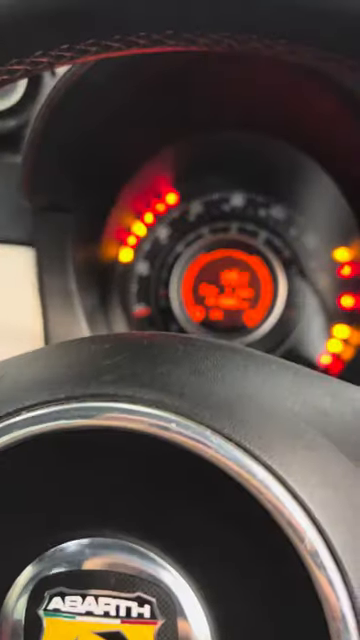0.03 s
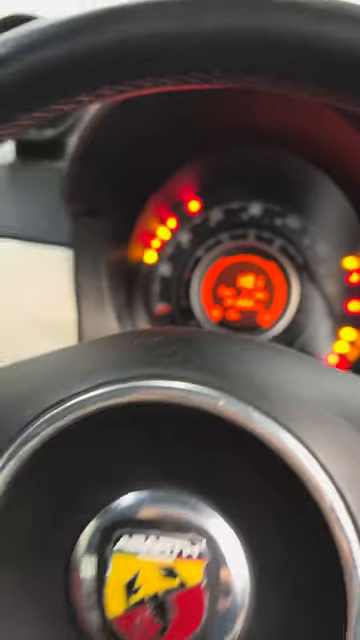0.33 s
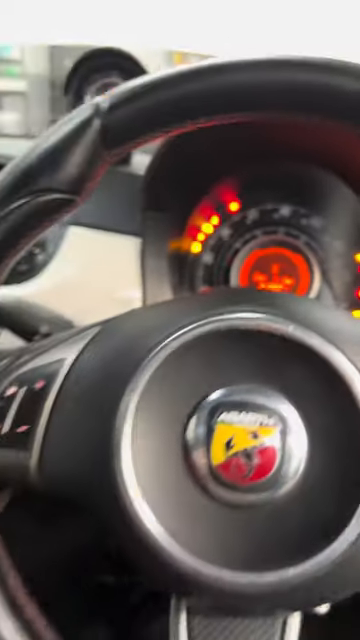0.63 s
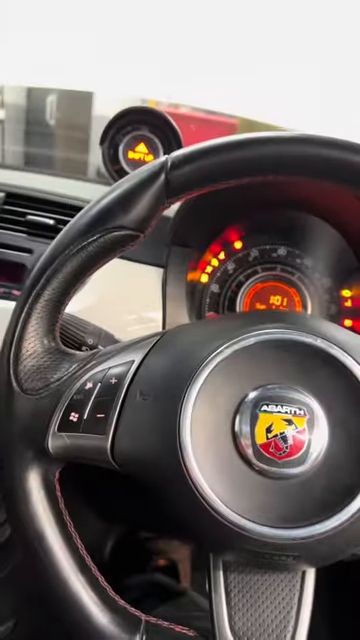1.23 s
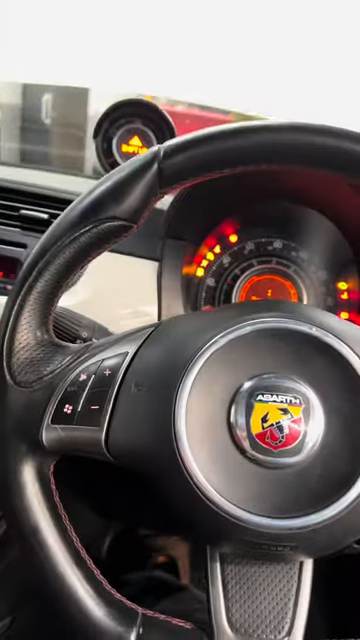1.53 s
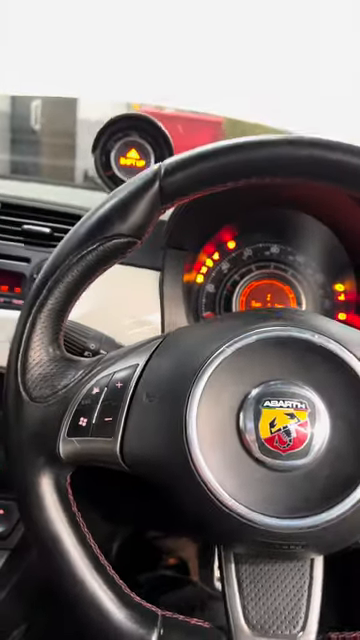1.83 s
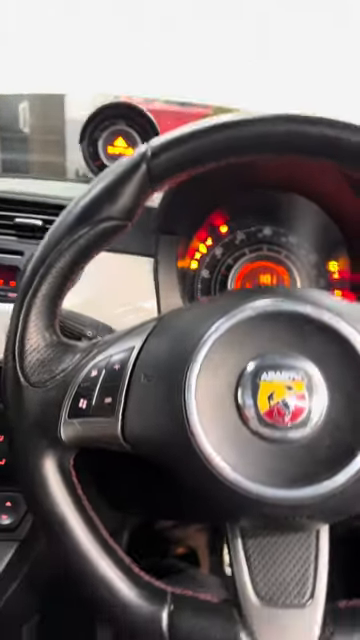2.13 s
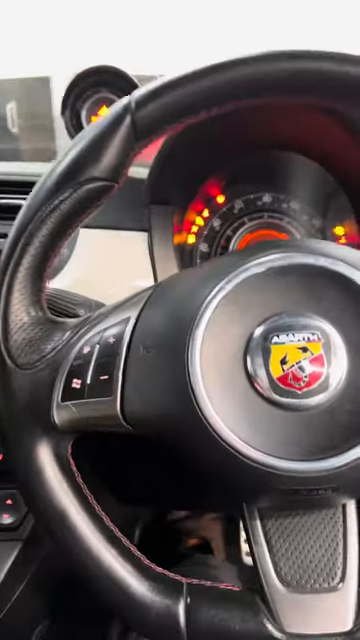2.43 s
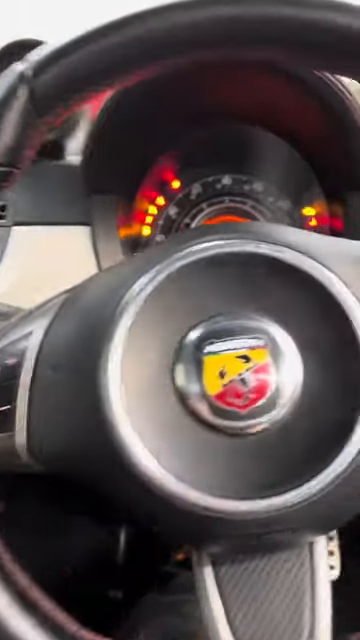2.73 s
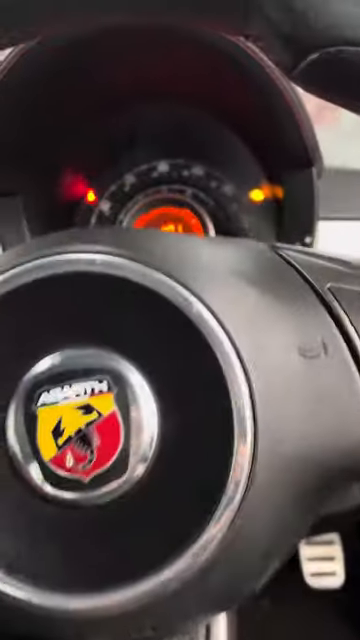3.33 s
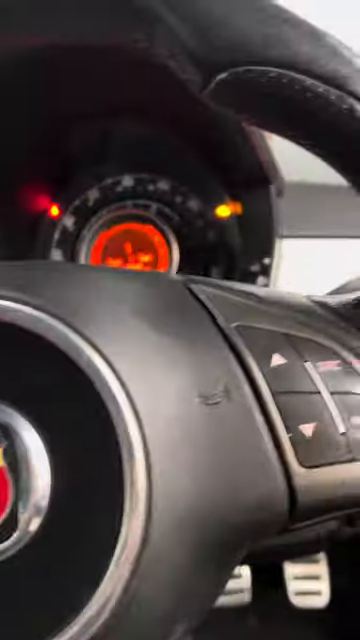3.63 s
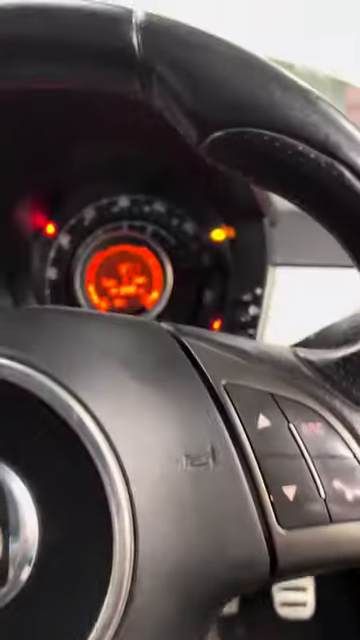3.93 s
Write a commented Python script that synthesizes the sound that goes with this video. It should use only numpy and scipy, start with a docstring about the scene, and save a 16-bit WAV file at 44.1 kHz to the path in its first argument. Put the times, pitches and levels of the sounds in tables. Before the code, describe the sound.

Inside a closed, parked car, the engine idles steadily, its hum gently swelling and fading as the phone moves. Brief rumble and rustle open it, and scattered plastic clicks and soft knocks follow.

```python
"""Idling car, driver's seat

A four-cylinder engine idles, heard in the closed cabin on a hand-held phone. The phone moves through
standing waves, so each firing harmonic swells and fades alone. Shaken body panels drone and sing
under faint air hiss and a hollow wash. Handling adds rumble, plastic clicks, knocks and rustle.
A faint, thin whistle sounds once, briefly."""
import sys
import numpy as np
from scipy import signal
from scipy.fft import rfft, irfft
from scipy.io import wavfile
from scipy.ndimage import uniform_filter1d

SR = 44100
rng = np.random.default_rng(int(sys.argv[2]) if len(sys.argv) > 2 else 0)


def output_pcm(signal):
    """Save a mono or channel-first signal as 16-bit PCM at the path in sys.argv[1].

    Samples are clipped to [-1, 1] before scaling.
    """
    pcm = np.clip(np.atleast_2d(signal).T, -1, 1) * 32767
    wavfile.write(sys.argv[1], SR, np.round(pcm).astype(np.int16))


N = 176400

# idle firing rate: t/s, f/Hz
FIRING_HZ = [(0, 44), (0.2, 44.4), (0.45, 43.75), (0.8, 43.85), (1.1, 44.25), (1.45, 45), (1.72, 44.25),
             (1.93, 45.85), (2.15, 45.6), (2.45, 45.7), (2.7, 45), (3, 44.35), (3.25, 44.3), (3.45, 43.05),
             (3.9, 43.95), (4, 43.9)]
# firing harmonics 1-5 and loudest panel, at the phone: t/s, level/dB
HARMONIC_1_DB = [(0.0, -23.5), (0.22, -31), (1.04, -47), (1.76, -30), (2.22, -40), (3.32, -36.5),
                 (3.54, -50.5), (4.0, -39.5)]
HARMONIC_2_DB = [(0.0, -28.5), (0.08, -10.5), (0.14, -39), (0.2, -22.5), (0.299, -17.5), (0.54, -15),
                 (0.998, -15.5), (1.46, -24.5), (1.78, -18), (1.959, -30), (2.26, -22), (3.0, -30),
                 (3.321, -25.5), (3.419, -18), (3.68, -24.5), (4.0, -19)]
HARMONIC_3_DB = [(0.0, -27.5), (0.94, -35.5), (1.22, -42), (1.5, -31.5), (1.96, -31), (2.12, -40.5),
                 (2.64, -37), (3.26, -49), (3.38, -27), (3.62, -26.5), (4.0, -53.5)]
HARMONIC_4_DB = [(0.0, -41), (0.4, -46), (0.979, -33), (1.72, -34.5), (2.66, -32), (3.28, -34), (3.66, -51),
                 (3.84, -38.5), (4.0, -25)]
HARMONIC_5_DB = [(0.0, -65), (0.422, -42), (0.94, -45.5), (1.119, -43), (1.781, -39.5), (2.218, -25),
                 (2.52, -24.5), (2.98, -42.5), (4.0, -33.5)]
LOUDEST_PANEL_DB = [(0, -44), (.34, -29), (.5, -49), (.94, -53), (1.34, -31), (1.76, -38.5), (1.949, -25),
                    (2.7, -29.5), (3.46, -47), (4, -32.5)]

# relative spectra of the continuous layers: f/Hz, level/dB
DRONE_TONE_SPECTRUM = [(150, -14), (200, -2.5), (245, -6), (290, -6.5), (335, -1), (361, 7), (378, -6.5),
                       (400, -4.5), (425, 1), (445, -5.5), (495, -4.5), (525, -22.5), (549, 0),
                       (580, -19.5), (610, -11.5), (720, -17.5)]
DRONE_NOISE_SPECTRUM = [(30, -40.5), (70, -15), (120, -4.5), (200, -3), (260, -6.5), (310, -2.5), (350, -2),
                        (400, 3), (450, -4.5), (495, 4.5), (520, -7), (550, 3), (580, -3.5), (610, -21.5),
                        (665, -11.5), (750, -22), (1500, -51.5)]
AIR_SPECTRUM = [(100, 7.5), (400, -0.5), (620, -12.5), (820, -0.5), (950, -4), (1100, 1), (1250, -3.5),
                (1480, 0.5), (1620, -1.5), (1750, -4.5), (1900, -5.5), (2700, -9.5), (3300, -13),
                (4300, -13), (5000, -18), (5700, -50.5), (8000, -21), (10000, -29), (12000, -58)]
HISS_SPECTRUM = [(2000, -17), (3800, 2.5), (4600, -4.5), (5200, 5), (5700, 8.5), (7200, 8), (8200, 3),
                 (9300, -6), (10500, -24), (12000, -57), (15000, -56)]
WASH_SPECTRUM = [(400, -31), (560, -8.5), (680, 17.5), (790, -4.5), (900, -6), (1100, -17.5), (1500, -45)]
RUMBLE_SPECTRUM = [(8, -38.5), (18, 3), (30, -15.5), (60, 5), (100, 5.5), (160, 0), (300, -40), (800, -62)]
# their envelopes: t/s, level/dB
DRONE_DB = [(0, -27), (.14, -23.5), (.3, -29), (.5, -30), (1.1, -34.5), (1.8, -33.5), (2.3, -34),
            (2.8, -32), (3.3, -35), (4, -31.5)]
AIR_DB = [(0, -32.5), (.12, -33), (.3, -40.5), (.5, -42), (.8, -43.5), (1.55, -42.5), (2.2, -42.5),
          (3.2, -44), (3.8, -43.5), (3.9, -41.5), (4, -43)]
HISS_DB = [(0, -42), (.1, -41), (.32, -51.5), (.5, -53), (.8, -54.5), (1.6, -55.5), (3.2, -55), (3.85, -55),
           (4, -51.5)]
WASH_DB = [(0, -47), (.12, -41.5), (.4, -46.5), (.7, -59.5), (1.9, -69.5), (2.5, -48.5), (3.1, -50.5),
           (3.7, -48.5), (3.83, -52), (3.9, -41), (4, -44)]
RUMBLE_DB = [(0, -43), (.1, -19.5), (.22, -23.5), (.4, -38.5), (1.1, -36), (1.7, -39.5), (2.3, -49.5),
             (2.5, -35), (2.6, -28), (2.75, -35.5), (3.8, -33.5), (3.95, -25), (4, -32.5)]

# plastic clicks: t/s, body/dB, clack/dB, snap/dB, attack/s, t60/s
CLICK_HITS = [(0.0446, -43, -30, -23.5, 0.00078, 0.04), (0.0646, -33, -28.5, -16.5, 0.0012, 0.023),
              (.452, -46, -44.5, -45, .002, 0.07), (0.903, -49.5, -42.5, -52, 0.0056, 0.13),
              (.934, -45, -46.5, -57, 0.0033, 0.13), (0.9816, -25, -37, -38.5, 0.0011, 0.041),
              (1.039, -65, -67, -48, .003, 0.036), (1.216, -38, -43, -49, 0.00061, 0.027),
              (1.722, -65, -46, -51.5, 0.0049, 0.11), (2.373, -58, -42.5, -56, 0.0015, 0.07),
              (2.485, -32, -39.5, -42.5, 0.0015, .055), (2.54, -38, -39.5, -45.5, .002, 0.049),
              (2.5537, -28, -29, -37.5, 0.0017, 0.026), (2.5593, -25.5, -28.5, -47, 0.0011, 0.021),
              (3.312, -69, -64, -49, .002, 0.03), (3.684, -61, -55, -45.5, 0.0019, 0.028),
              (3.884, -37, -65, -60, 0.0014, 0.078), (3.9, -38, -59, -43, 0.0069, 0.044),
              (3.948, -40, -46, -38.5, 0.0015, 0.14)]
# low, mid and high click bands, relative: f/Hz, level/dB
BODY_SPECTRUM = [(300, -14.5), (520, 5), (700, -22), (900, 26.5), (1200, 18), (1450, 11), (2000, -47.5)]
CLACK_SPECTRUM = [(1000, -37), (1800, -1), (2300, 2), (2600, 3), (3200, -6), (4200, -9), (5200, -16.5),
                  (9000, -32), (13000, -64.5)]
SNAP_SPECTRUM = [(2500, -24.5), (3800, -2.5), (5000, -4), (5700, -1.5), (7000, -1), (8400, -4.5),
                 (10000, -14), (11600, -13), (12800, -37.5), (15500, -53)]
# plastic trim modes: f/Hz, level/dB re clack, t60/s
TRIM_MODES = [(910, -21, .15), (1100, -18, .14), (1410, -8.5, 0.053), (2314, -5.5, 0.054),
              (2525, -5.5, .03), (2820, -17, 0.046), (4300, -21.5, .04)]
# soft knocks: t/s, f/Hz, level/dB, t60/s
KNOCK_HITS = [(0.05, 75.3, -8, 0.043), (0.129, 367, -9.5, 0.07), (.157, 329, -14.5, 0.062),
              (.172, 502, -21, 0.2), (.226, 448, -20, 0.093), (0.299, 530, -20, 0.079),
              (.983, 490, -18, 0.05), (2.488, 850, -27.5, 0.11), (2.555, 70.4, -24.5, 0.86),
              (3.868, 263, -19.5, 0.15), (3.898, 994, -19.5, 0.057), (3.922, 284.4, -19, 0.14),
              (3.952, 760, -23, 0.067), (3.96, 394, -28.5, 0.089)]
# grip shifts: t/s, sigma/s, level/dB
RUSTLE_SWELLS = [(0.074, 0.024, -39), (.19, 0.082, -46), (.27, 0.063, -45.5), (1.87, 0.13, -60.5)]
# grip rustle, relative: f/Hz, level/dB
RUSTLE_SPECTRUM = [(700, -22.5), (1100, 8), (1500, 3), (1850, 7.5), (2300, -11.5), (4000, -34)]
# panel resonances: f/firing rate, t/s, sigma/s, level/dB
PANEL_SWELLS = [(4.25, .18, .04, -24.5), (4.25, .278, .03, -23), (8.25, .255, .045, -26.5),
                (7.75, .33, .03, -31), (8.25, .72, .26, -33.5), (7.75, 2.42, .22, -31.5),
                (8.25, 2.25, .22, -35), (9.25, 2.3, .38, -34.5), (10.25, 2.3, .2, -41), (12, 1.45, .3, -42),
                (12, 2.32, .2, -37), (8.25, 3.74, .1, -36)]
# thin whistle, relative: f/Hz, level/dB
WHISTLE_SPECTRUM = [(6500, -42), (7300, -19), (7460, 1), (7650, -5), (8300, -38)]

# left microphone port re right: f/Hz, lead/rad
PORT_LEAD_RAD = [(90, 0), (180, .45), (270, 1), (400, 1.98), (560, 2.25), (700, 2.8), (900, 2.4),
                 (1500, 4.9), (3000, 4.6), (4200, 5.0), (5000, 5.3), (5600, 6.28), (7300, 6.28),
                 (9000, 5.4), (13000, 3.3)]
# left port re right: f/Hz, level/dB
PORT_BALANCE_DB = [(45, 0), (88, -2), (132, -3.5), (180, -6.5), (226, -2), (360, -0.7), (560, 0.5),
                   (1200, 3.5), (3500, 1.5), (6000, 0.4)]

TIME_S = np.arange(N) / SR


def undb(db):
    """Decibels to gain."""
    return 10 ** (np.asarray(db) / 20)


def unit(x):
    """Scale to rms 1."""
    return x / np.sqrt(np.mean(x ** 2))


def curve(rows):
    """Interpolate (t/s, value) rows per sample."""
    return np.interp(TIME_S, *np.array(rows, float).T)


def per_bin(rows):
    """Interpolate (f/Hz, value) rows per FFT bin, in log f."""
    hz, value = np.array(rows, float).T
    bin_hz = np.arange(N + 1) * SR / (2 * N)
    return np.interp(np.log(bin_hz + 1e-9), np.log(hz), value)


def shape(x, response):
    """Filter by a frequency response."""
    return irfft(rfft(x, 2 * N) * response)[..., :N]


def noise(spectrum):
    """Coloured noise, rms 1."""
    return unit(shape(rng.standard_normal(N), undb(per_bin(spectrum))))


def diffuse(spectrum):
    """Coloured noise, independent left and right."""
    return np.array([noise(spectrum), noise(spectrum)])


def walk(rate_hz, count=N, hold=8):
    """Smooth random drift, rms about 1; count points span the scene."""
    steps = np.repeat(rng.standard_normal(200), hold)
    smooth = unit(uniform_filter1d(uniform_filter1d(steps, hold), hold))
    return np.interp(np.linspace(0, N / SR * rate_hz * hold, count), np.arange(len(smooth)), smooth)


def strike(at_s, attack_s, t60_s):
    """Exponential rise to 1 at at_s + attack_s, then decay."""
    t = TIME_S - (at_s + attack_s)
    log_gain = np.minimum(t / attack_s, -np.log(1000) * t / t60_s)
    return np.exp(np.maximum(log_gain, -20))


def swell(at_s, sigma_s):
    """Gaussian envelope."""
    return np.exp(-((TIME_S - at_s) / sigma_s) ** 2 / 2)


def engine_boom(firings, waver_db=.4, panel_multiple=8.75):
    """Firing harmonics stand as waves in the cabin; one loud panel tone lies above them."""
    tones = [(1, HARMONIC_1_DB), (2, HARMONIC_2_DB), (3, HARMONIC_3_DB), (4, HARMONIC_4_DB),
             (5, HARMONIC_5_DB), (panel_multiple, LOUDEST_PANEL_DB)]
    out = 0
    for multiple, levels in tones:
        gain = np.sqrt(2) * undb(curve(levels) + waver_db * walk(20))
        out += gain * np.sin(2 * np.pi * (multiple * firings + rng.random()))
    return out


def panel_drone(firings, even_db=-5, waver_db=4.5, waver_rad=.44, noise_db=-1.5, decimation=15):
    """Unequal cylinders shake the body at mostly odd cycle harmonics; its resonances favour a few."""
    body_hz, body_db = np.array(DRONE_TONE_SPECTRUM, float).T
    cycle_hz = curve(FIRING_HZ)[::decimation] / 4  # four firings per cycle
    cycles = firings[::decimation] / 4
    tones = 0
    for harmonic in range(17, 67):
        level_db = np.interp(harmonic * cycle_hz, body_hz, body_db) + even_db * (harmonic % 2 == 0)
        gain = undb(level_db + waver_db * walk(2.72, len(cycles)))
        drift_rad = waver_rad * walk(10, len(cycles)) + 2 * np.pi * rng.random()
        tones += gain * np.sin(2 * np.pi * harmonic * cycles + drift_rad)
    drone = unit(signal.resample_poly(tones, decimation, 1, window="blackmanharris")[:N])
    roar = undb(noise_db) * noise(DRONE_NOISE_SPECTRUM)
    return (drone + roar) * undb(curve(DRONE_DB))


def cabin_air(flicker_db=1.44):
    """Diffuse air noise with a flickering level."""
    return diffuse(AIR_SPECTRUM) * undb(curve(AIR_DB) + flicker_db * walk(24.94))


def high_hiss(flicker_db=.85):
    """Faint treble hiss, common to both ports."""
    return noise(HISS_SPECTRUM) * undb(curve(HISS_DB) + flicker_db * walk(24.92))


def hollow_wash(diffuse_db=-1):
    """Noise band just above the drone, partly diffuse."""
    direct = ports(noise(WASH_SPECTRUM))
    return (direct + undb(diffuse_db) * diffuse(WASH_SPECTRUM)) * undb(curve(WASH_DB))


def phone_rumble():
    """Low noise of the moving phone."""
    return noise(RUMBLE_SPECTRUM) * undb(curve(RUMBLE_DB))


def plastic_clicks(tail_db=-15, tail_t60_s=.13):
    """Plastic rings in three broad bands with a short cabin tail, plus sharp trim modes."""
    body, clack, snap = noise(BODY_SPECTRUM), noise(CLACK_SPECTRUM), noise(SNAP_SPECTRUM)
    out = 0
    for at_s, body_db, clack_db, snap_db, attack_s, t60_s in CLICK_HITS:
        envelope = strike(at_s, attack_s, t60_s) + undb(tail_db) * strike(at_s, attack_s, tail_t60_s)
        bands = undb(body_db) * body + undb(clack_db) * clack + undb(snap_db) * snap
        ring = sum(undb(db) * strike(at_s, attack_s, ring_s) * np.sin(2 * np.pi * hz * TIME_S)
                   for hz, db, ring_s in TRIM_MODES)
        out += envelope * bands + undb(clack_db) * ring
    return out


def soft_knocks(attack_s=.0047):
    """Handling bumps, one damped resonance each."""
    return sum(undb(db) * strike(at_s, attack_s, t60_s) * np.sin(2 * np.pi * hz * (TIME_S - at_s))
               for at_s, hz, db, t60_s in KNOCK_HITS)


def grip_rustle():
    """The hand rubs the phone as the grip shifts."""
    envelope = sum(undb(db) * swell(at_s, sigma_s) for at_s, sigma_s, db in RUSTLE_SWELLS)
    return diffuse(RUSTLE_SPECTRUM) * envelope


def singing_panels(firings):
    """Single panels resonate on engine orders, swelling at set times."""
    return sum(np.sqrt(2) * undb(db) * swell(at_s, sigma_s) * np.sin(2 * np.pi * multiple * firings)
               for multiple, at_s, sigma_s, db in PANEL_SWELLS)


def faint_whistle(level_db=-51.5):
    """Faint, brief, thin whistle near 7.5 kHz."""
    return noise(WHISTLE_SPECTRUM) * undb(level_db) * swell(at_s=.322, sigma_s=.03)


def ports(x):
    """Sound reaches the two microphone ports with different phase."""
    lead_rad = per_bin(PORT_LEAD_RAD)
    return shape(x, np.exp(.5j * np.array([lead_rad, -lead_rad])))


def scene():
    """Engine, air, handling and whistle at the two ports."""
    firing_hz = curve(FIRING_HZ) * (1 + .0008 * walk(12))
    firings = np.cumsum(firing_hz) / SR
    engine = engine_boom(firings) + panel_drone(firings) + singing_panels(firings)
    direct = engine + high_hiss() + plastic_clicks() + soft_knocks() + phone_rumble() + faint_whistle()
    return ports(direct) + hollow_wash() + cabin_air() + grip_rustle()


def record(dry):
    """The ports differ in sensitivity and notch the treble; the phone cuts the top."""
    notch_hz, width_hz, depth_db, cutoff_hz = 5080, 190, -5.5, 15600
    bin_hz = np.linspace(0, SR / 2, N + 1)
    notch_db = depth_db * np.exp(-((bin_hz - notch_hz) / width_hz) ** 2)
    balance_db = per_bin(PORT_BALANCE_DB)
    heard = shape(dry, undb(np.array([balance_db, -balance_db]) / 2 + notch_db))
    lowpass = signal.ellip(8, .2, 70, cutoff_hz, fs=SR, output="sos")
    return signal.sosfilt(lowpass, heard)


dry = scene()
out = record(dry)
output_pcm(out)
```